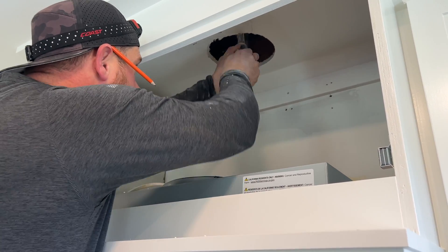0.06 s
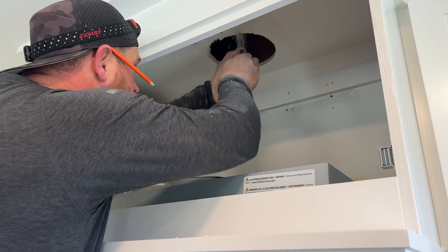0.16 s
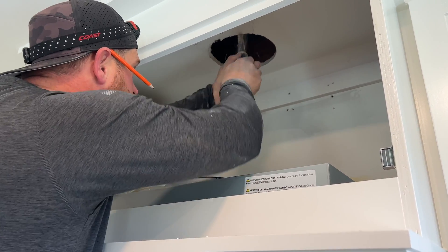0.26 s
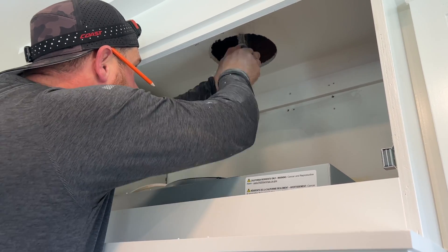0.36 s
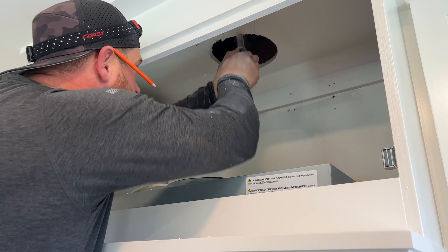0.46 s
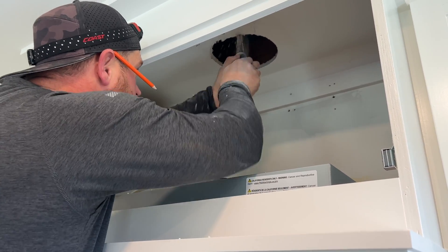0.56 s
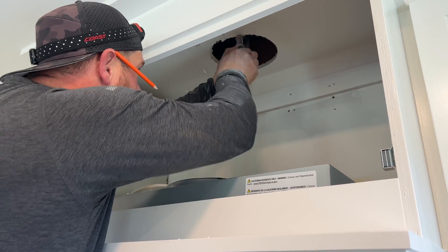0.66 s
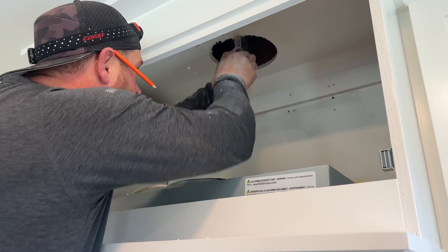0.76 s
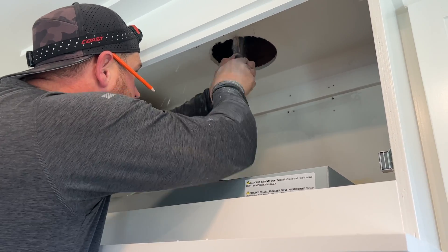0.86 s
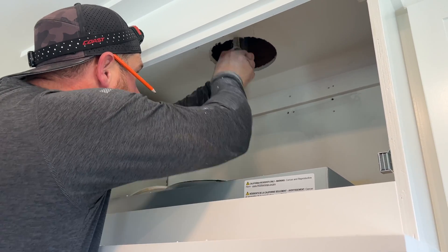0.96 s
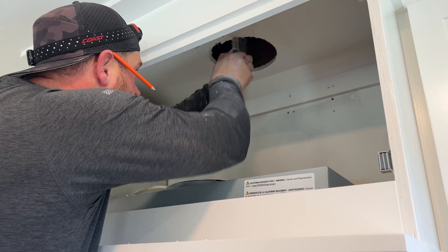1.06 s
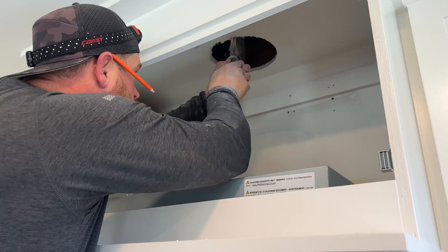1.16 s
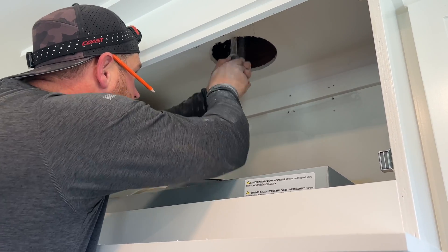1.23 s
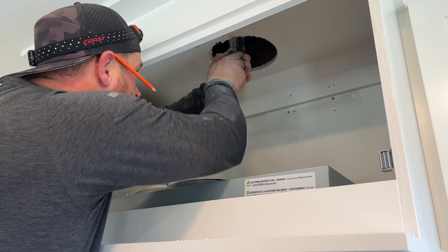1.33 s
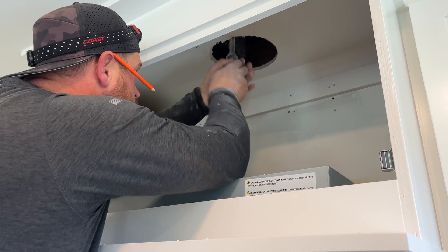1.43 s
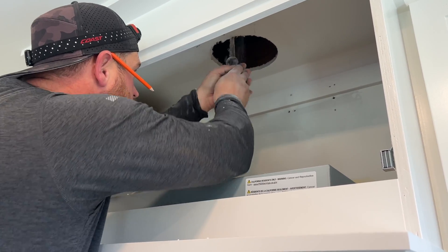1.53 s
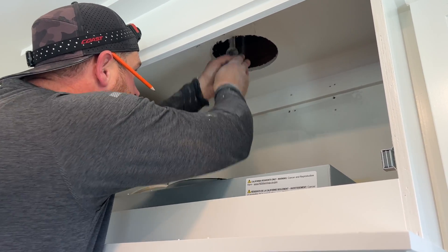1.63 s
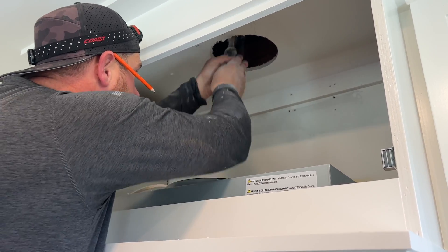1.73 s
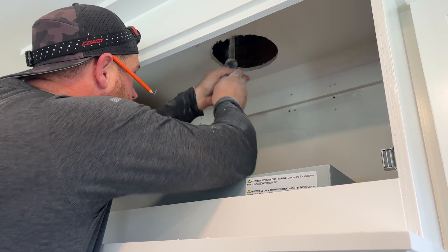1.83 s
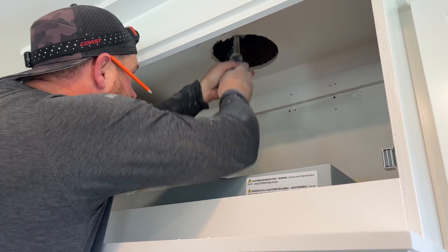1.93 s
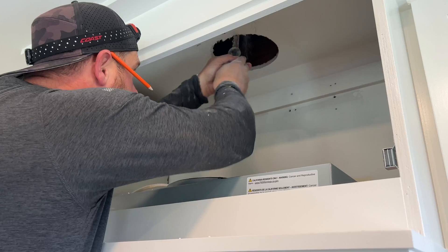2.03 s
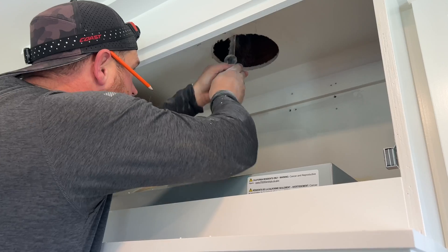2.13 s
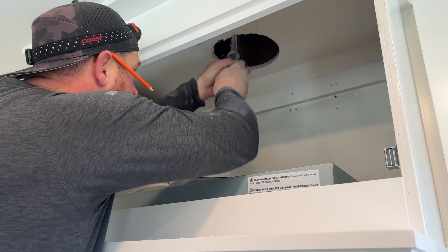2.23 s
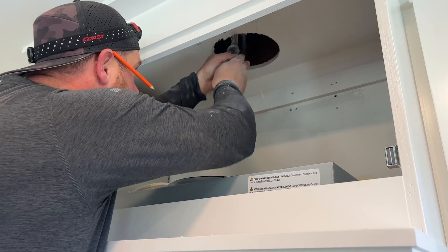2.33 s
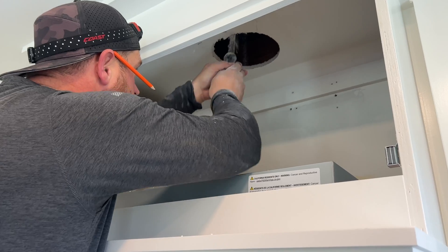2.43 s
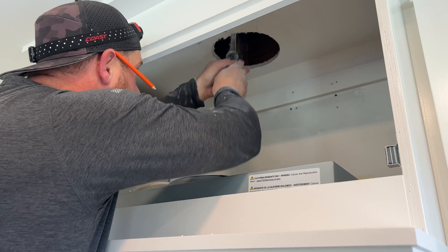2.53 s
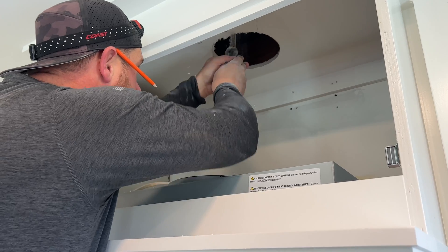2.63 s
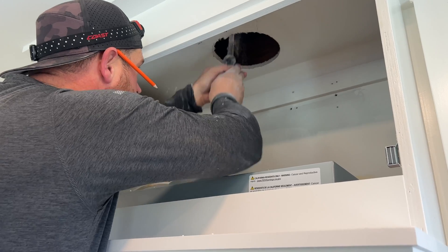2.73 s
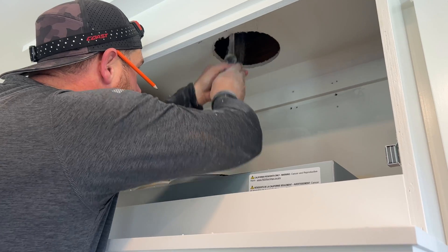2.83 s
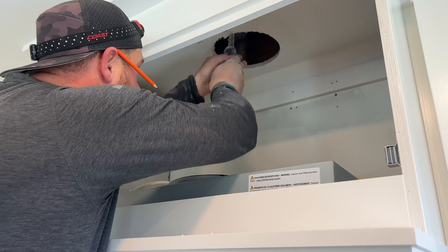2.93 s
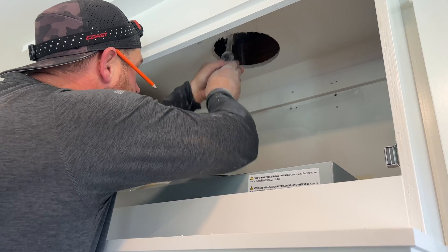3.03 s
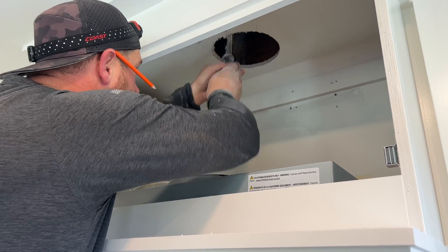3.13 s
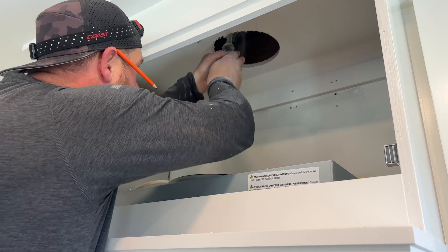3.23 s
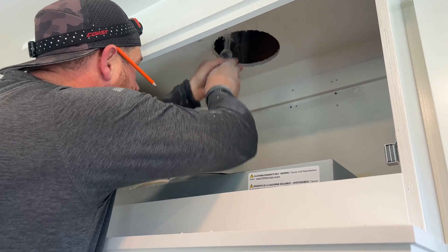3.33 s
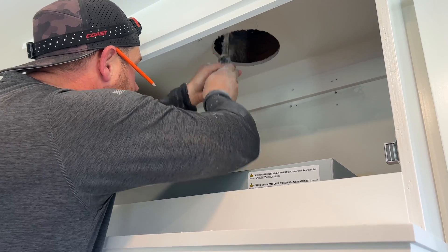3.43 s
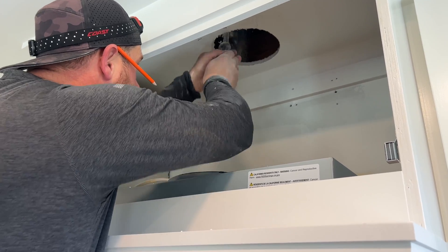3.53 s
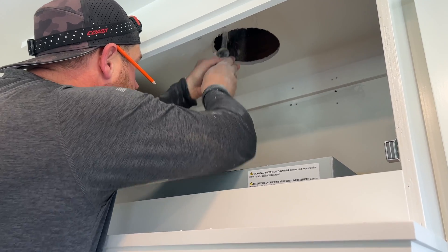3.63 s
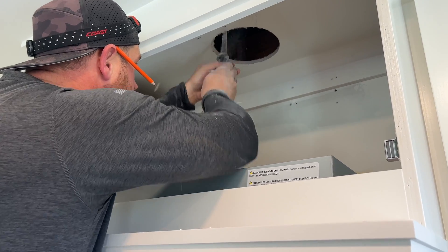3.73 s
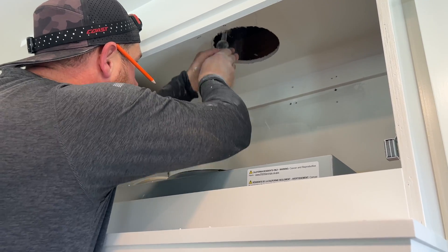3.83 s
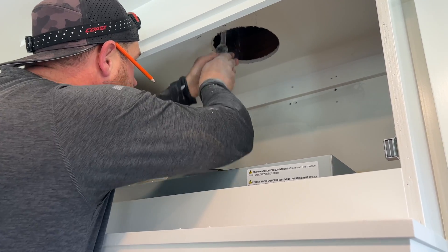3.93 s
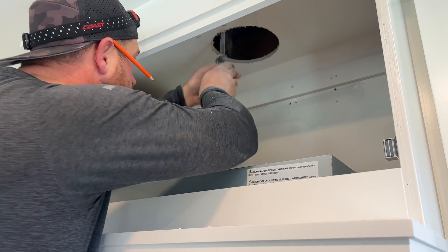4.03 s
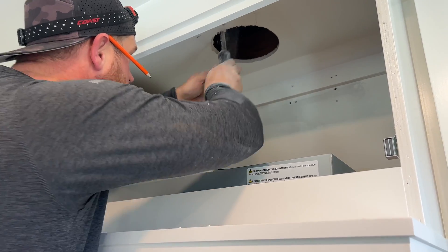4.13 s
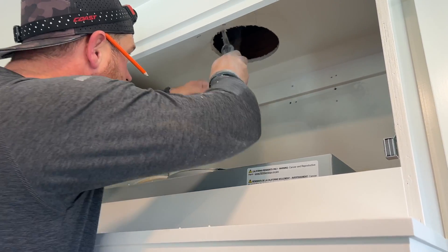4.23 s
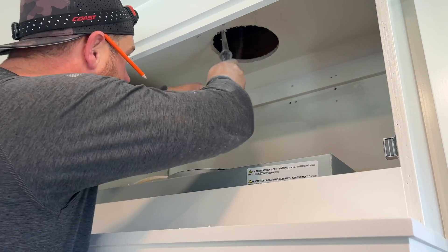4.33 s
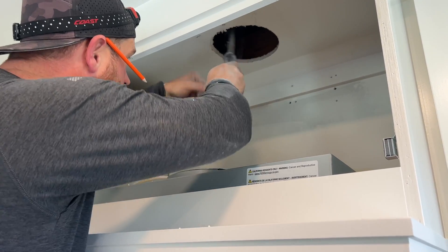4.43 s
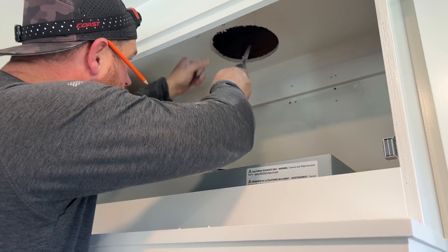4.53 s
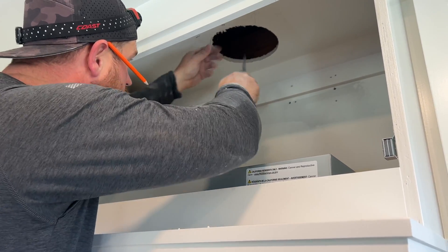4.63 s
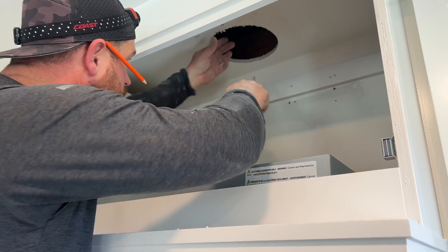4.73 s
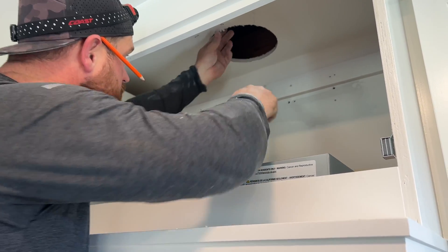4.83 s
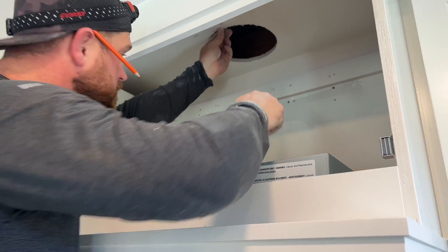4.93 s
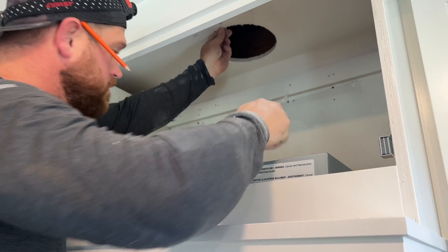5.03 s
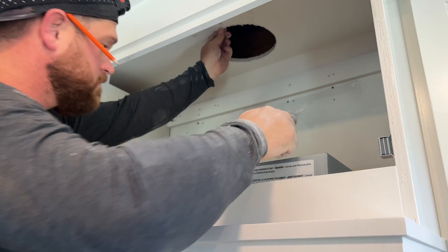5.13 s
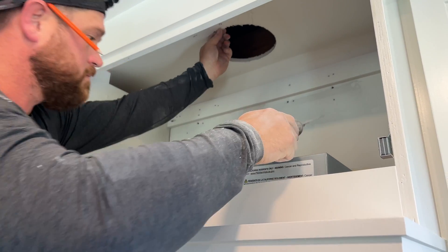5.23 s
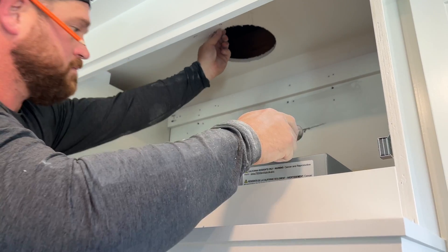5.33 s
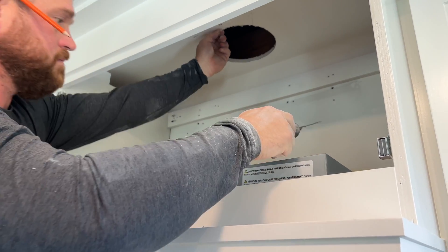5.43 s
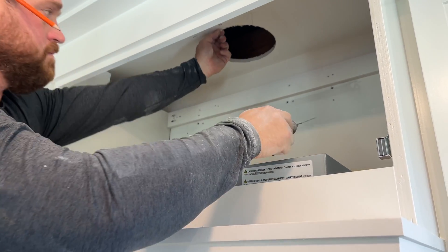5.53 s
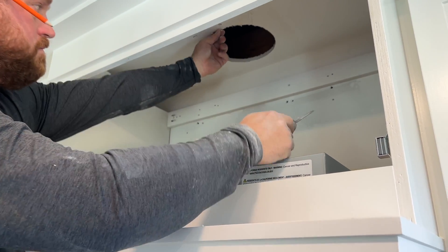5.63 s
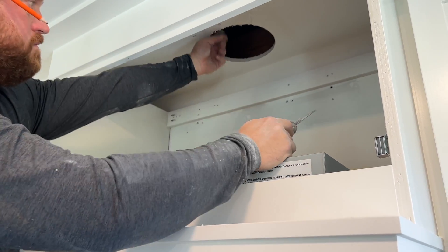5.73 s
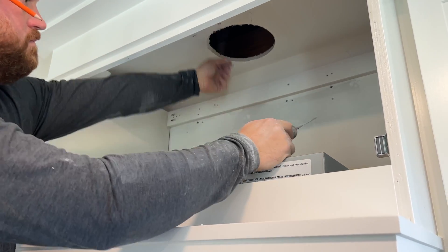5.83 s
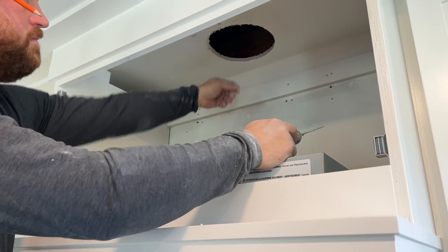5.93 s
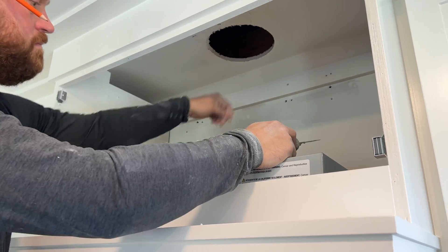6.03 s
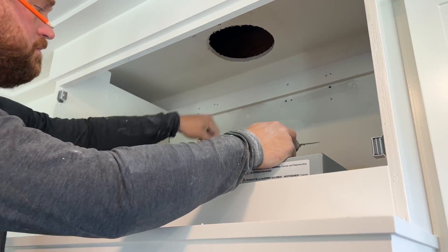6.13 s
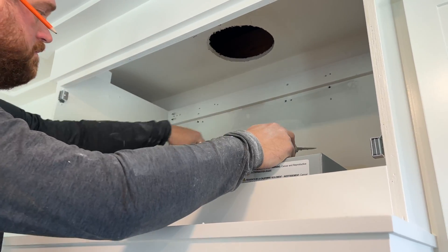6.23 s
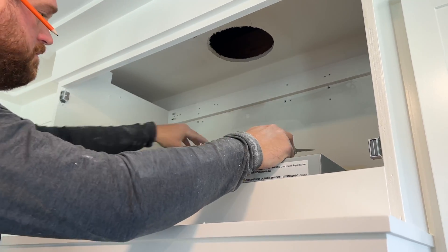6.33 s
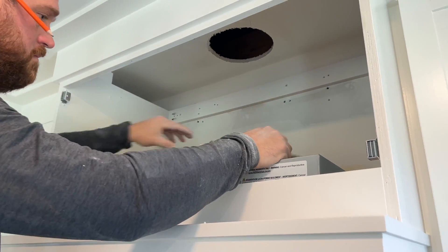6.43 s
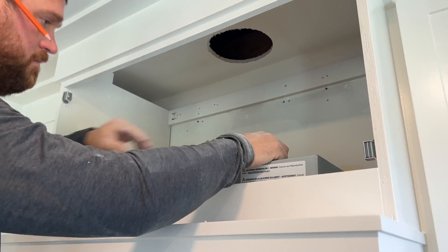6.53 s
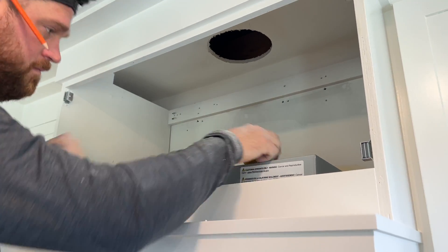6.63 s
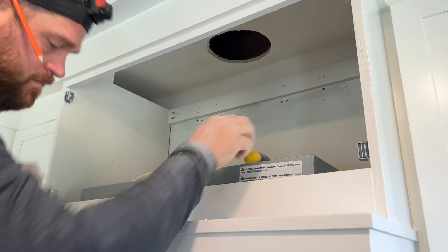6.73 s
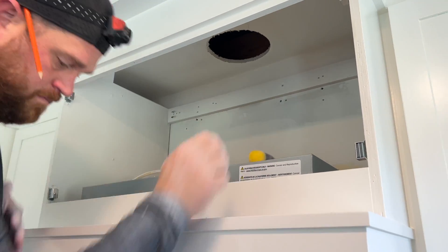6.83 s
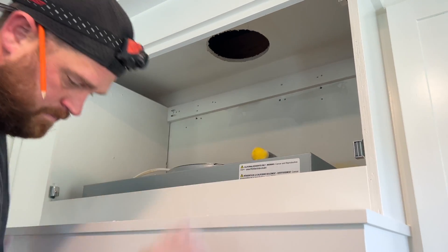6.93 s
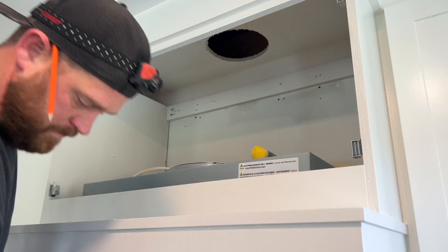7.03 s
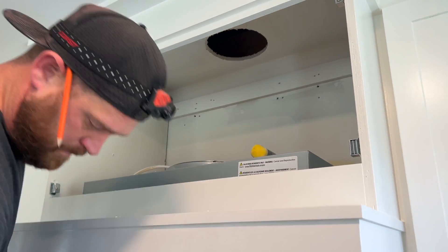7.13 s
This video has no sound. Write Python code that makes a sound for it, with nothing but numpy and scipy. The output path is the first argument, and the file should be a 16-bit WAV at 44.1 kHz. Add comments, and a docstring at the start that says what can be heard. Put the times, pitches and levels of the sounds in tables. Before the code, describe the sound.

Fast back-and-forth sawing of drywall with crunch and low judder in a hard kitchen, then quiet brushing and a sudden resonant knock of the tool landing.

```python
"""Sawing a hole in a kitchen ceiling

A jab saw cuts a round hole in plasterboard, about six strokes a second: shaped grains make its hiss,
crunch and growl, and teeth that catch ring the low tones of the sheet. Crumbs snap off, fingers brush
the rim, and the saw drops in a cupboard, where its blows ring the shelf. Noise echoes add a hard
kitchen, soft noise its air, and a phone hears it all through two ports."""
import sys
import numpy as np
from scipy import signal
from scipy.fft import rfft, irfft
from scipy.io import wavfile
from scipy.ndimage import uniform_filter1d

SR = 44100
rng = np.random.default_rng(int(sys.argv[2]) if len(sys.argv) > 2 else 0)


def wav_record(signal):
    """Record a signal, one row per channel, as 16-bit PCM in the file named by sys.argv[1]."""
    frames = np.transpose(np.atleast_2d(signal))
    bounded = np.clip(frames, -1, 1)
    # unit amplitude maps onto the largest positive 16-bit level
    quanta = np.round(bounded * 32767).astype(np.int16)
    wavfile.write(sys.argv[1], SR, quanta)


N = 315756  # length in samples
T = np.arange(N) / SR  # time in seconds
# All levels in the tables are relative: the functions that play them may add an overall level.


def gain(db):
    """Turn decibels into a plain multiplier."""
    return 10 ** (np.asarray(db) / 20)


def unit(x):
    """Scale to an rms of 1."""
    return x / np.sqrt(np.mean(x ** 2) + 1e-20)


def along(points, hz):
    """Read a curve of (f/Hz, value) points, with pitch on a log scale."""
    f, value = np.transpose(points)
    return np.interp(np.log(np.maximum(hz, 1)), np.log(f), value)


def convolve(x, response):
    """Let every sample of x set off the response; keep the length of x."""
    return signal.fftconvolve(x, response)[:len(x)]


def colour(points, rings=(), size=8192):
    """Make a unit-energy filter that only looks back: a smooth spectrum plus narrow peaks or dips."""
    hz = np.fft.rfftfreq(size, 1 / SR)
    db = along(points, hz)
    for f, width, lift in rings:
        db = db + lift / (1 + ((hz - f) / (width / 2)) ** 2)
    # folding the cepstrum forward in time gives the minimum-phase response
    cepstrum = irfft(np.log(gain(db)))
    cepstrum[1:size // 2] *= 2
    cepstrum[size // 2 + 1:] = 0
    return unit(irfft(np.exp(rfft(cepstrum)))) / np.sqrt(size)


def fade(t60):
    """Die away for one second, falling 60 dB in every t60 seconds."""
    return np.exp(-np.log(1000) * T[:SR] / t60)


def mode(hz, t60):
    """Ring one struck tone as a dying sine."""
    return np.sin(2 * np.pi * hz * T[:SR]) * fade(t60)


def burst(t60):
    """Make dying noise of unit energy, with its spectrum evened out."""
    spectrum = rfft(rng.standard_normal(SR) * fade(t60))
    ripple = np.sqrt(uniform_filter1d(np.abs(spectrum) ** 2, int(2 / t60) + 1))
    even = irfft(spectrum / ripple)
    return unit(even * fade(10 * t60)) / np.sqrt(SR)


def add(track, start, sound):
    """Mix a sound in at a time in seconds."""
    i = int(start * SR)
    track[i:i + len(sound)] += sound[:max(N - i, 0)]


def grains(rate, spread_db):
    """Scatter tiny cracks at random, about `rate` a second, in random sizes and signs."""
    size = gain(spread_db * np.minimum(rng.exponential(size=N), 4))
    return unit((rng.random(N) < rate / SR) * size * rng.choice([-1, 1], N))


def swell(start, length, peak, power):
    """Rise to a peak (a share of the length) and fall to nothing; cut off what lies before time 0."""
    shape = np.interp(T[:int(length * SR)] / length, [0, np.clip(peak, .1, .9), 1], [0, 1, 0])
    return unit(np.sin(np.pi / 2 * shape) ** power)[max(0, int(-start * SR)):]


def slides(rows, grit, peak, power):
    """Rub grainily: pressure swells and fades with each pass and sets how loud the grains are."""
    pressure = np.zeros(N)
    for start, length, db in rows:
        add(pressure, start, gain(db) * swell(start, length, peak, power))
    return pressure * grit


def squeals(rows, hz, t60):
    """Squeal: friction noise feeds one narrow tone for the length of each slip."""
    track = np.zeros(N)
    for start, length, db in rows:
        slip = swell(start, length, 0.39, power=0.81)
        tone = convolve(rng.standard_normal(SR), mode(hz, t60))[:len(slip)]
        add(track, start, gain(db) * slip * unit(tone))
    return track


# how long the kitchen rings at each pitch: (f/Hz, t60/s)
KITCHEN_DECAY = [(100, 0.61), (250, 0.88), (700, 0.72), (1500, 0.62), (4000, 0.61), (8000, 0.4),
                 (14000, 0.22)]


def room(x, cupboard_db, kitchen_db, cupboard_t60=0.073):
    """Add quick cupboard echoes and a slower kitchen tail; direct sound goes mostly to mid, little to side."""
    hz = np.fft.rfftfreq(SR, 1 / SR)
    out = []
    for direct in (1, 0.044):  # mid, then side
        noise = rfft(rng.standard_normal(SR))
        tail = 0
        for k, (_, t60) in enumerate(KITCHEN_DECAY):
            # this band is full at its own pitch and blends into its neighbours
            band = along([(f, j == k) for j, (f, _) in enumerate(KITCHEN_DECAY)], hz)
            tail = tail + irfft(noise * band) * fade(t60)
        tail = tail * np.minimum(T[:SR] / 0.015, 1) * np.sqrt(20 / SR)  # builds up over 15 ms
        echoes = gain(cupboard_db) * burst(cupboard_t60) + gain(kitchen_db) * tail
        out.append(direct * x + convolve(x, echoes))
    return np.array(out) / np.sqrt(1 + gain(cupboard_db) ** 2 + gain(kitchen_db) ** 2)


# spectrum of the still air in the kitchen: (f/Hz, level/dB)
AIR_COLOUR = [(18, -46.5), (30, -5.5), (284, -9.5), (324, -12), (410, -10), (455, -18.5), (970, -24.5),
              (1140, -25), (4000, -37.5), (10200, -37.5), (15500, -30.5)]


def kitchen_air(level_db=-61):
    """Fill mid and side with steady, separate noises in the colour of still air."""
    return gain(level_db) * np.array([convolve(rng.standard_normal(N), colour(AIR_COLOUR)) for _ in range(2)])


# saw strokes, in and out by turns, each lasting until the next:
# (t/s, blade hiss level/dB, force level/dB, judder level/dB, deepest bite [share of the stroke])
STROKE_ROWS = [(-0.075, -44.5, -34.5, -17.5, 0.86), (0.059, -47.5, -35, -13, .58),
               (0.246, -48.5, -39, -14.5, .66), (0.393, -46, -33, -12, 0.7),
               (0.553, -47.5, -37.5, -18, .66), (0.706, -48, -34, -13.5, 0.53),
               (0.871, -47.5, -37, -11.5, 0.62), (1.02, -47.5, -33, -12.5, 0.67),
               (1.176, -50, -37.5, -12.5, .6), (1.344, -60, -46.5, -27.5, 0.74),
               (1.538, -47, -36, -15.5, 0.73), (1.697, -45, -39, -23.5, .36), (1.867, -52.5, -45, -31, 0.2),
               (2.049, -47.5, -36.5, -17, .7), (2.171, -48.5, -44.5, -20.5, .44),
               (2.342, -46, -34, -12, 0.62), (2.482, -50, -37.5, -15.5, .68),
               (2.624, -46.5, -35, -18.5, 0.7), (2.779, -45, -35.5, -11.5, .8),
               (2.927, -47.5, -36, -15, 0.91), (3.099, -44, -35, -12, 0.72), (3.251, -43.5, -34, -16, 0.67),
               (3.416, -45, -34.5, -11.5, 0.69), (3.544, -49, -40, -16, 0.62),
               (3.717, -44.5, -34, -18, 0.6), (3.838, -49, -37, -15, .55)]
SAW_STOPS_S = 4.113
ENGAGE_S = .034  # from the start of a stroke to its first snapping tooth


def strokes():
    """Give each stroke its length, up to the next turn: (start, length, hiss, force, judder, deepest)."""
    ends = [row[0] for row in STROKE_ROWS[1:]] + [SAW_STOPS_S]
    return [(start, end - start, *rest) for (start, *rest), end in zip(STROKE_ROWS, ends)]


# the two low tones of the ceiling sheet: (f/Hz, t60/s)
DRUM, SAG = (125.8, 0.056), (77.8, 0.29)


def judder(length, hz, drum, sag, jitter=.11, scatter_db=6.5, limp=0.43, arch=0.21):
    """Teeth catch and let go unevenly, kicking the sheet; return its boom and the jerks."""
    count = max(2, int(round(length * hz)))
    # the more the drum tone outweighs the sag tone, the more evenly the teeth catch
    chance = rng.standard_normal((32, 2))[:count] * min(gain((sag - drum) / 2), 1)
    catches_s = (np.cumsum(1 + jitter * chance[:, 0]) - 1).clip(0) / hz
    at = (catches_s * SR).astype(int)
    grip = np.sin(np.pi * (np.arange(count) + .5) / count) ** arch
    size = gain(scatter_db * chance[:, 1])
    strong_weak = 1 + limp * (-1) ** np.arange(count)
    kicks, sway, boom = np.zeros((3, SR // 2))
    kicks[at] = grip * size
    sway[at] = grip * (size * strong_weak - size.mean())
    span = slice(SR // 200, int(length * SR) + SR // 100)  # where loudness is set
    # every catch drives the drum tone; their unevenness rocks the lower sag tone
    for push, ring, db in ((kicks, DRUM, drum), (sway, SAG, sag)):
        radiation = signal.butter(1, [ring[0] / 2, ring[0] * 2], "bandpass", fs=SR, output="sos")
        motion = signal.sosfilt(radiation, convolve(push, mode(*ring)))
        boom += motion * gain(db) / np.std(motion[span])
    return boom, kicks * gain(drum / 2)


# on the last stroke the blade jams and locks on to the sheet:
# (t/s, length/s, catches f/Hz, drum level/dB, sag level/dB)
JAM_SPELL = (4, .116, 128, -8.5, -28.5)
CATCH_HZ, CATCH_SPREAD = 121.2, 0.065  # catches a second, near the drum tone, and their random share
JUDDER_S, JUDDER_LEAD = .1, .5  # length of a spell, and its share before the deepest bite
SAG_DB, SAG_DB_PER_DB = -6.5, 0.82  # the sag tone grows more slowly than the judder that drives it


def sheet(drum_db=-0.36):
    """Shake the ceiling sheet around the deepest bite of every stroke, and hardest in the jam."""
    boom, jerks = np.zeros((2, N))
    spells = []
    for start, length, _, _, db, deepest in strokes():
        onset = start + deepest * length - JUDDER_LEAD * JUDDER_S
        catch_hz = CATCH_HZ * (1 + CATCH_SPREAD * rng.standard_normal())
        spells.append((onset, JUDDER_S, catch_hz, db + drum_db, SAG_DB + SAG_DB_PER_DB * db))
    for onset, *spell in spells + [JAM_SPELL]:
        for track, sound in zip((boom, jerks), judder(*spell)):
            add(track, max(onset, 0), sound)
    return boom, jerks


# the blade binds in the cut and sings: (t/s, length/s, level/dB)
SINGING_SLIPS = [(.45, .129, -45), (1.06, 0.13, -40), (2.66, 0.066, -36.5), (3.13, 0.095, -41),
                 (3.29, .145, -35.5), (3.615, .074, -39)]


def singing_blade(blade_hz=1123):
    """Sing when the blade binds: friction feeds its one narrow tone."""
    return room(squeals(SINGING_SLIPS, blade_hz, t60=0.51), cupboard_db=-14, kitchen_db=-20.5)


# narrow resonances (and a dip) of board, cupboard and blade: (f/Hz, width f/Hz, lift level/dB)
BODY_RINGS = [(219.8, 11, 10.5), (242.5, 16, 6.5), (363, 13, 3.5), (464, 12, 1.5), (529, 81, 8),
              (594, 43, 5), (749, 39.2, 12.5), (870, 23, 5.5), (1121, 58, 9), (1205, 22, 0.5),
              (1613, 96, 8), (1900, 38, -16), (2574, 69, 7), (2860, 34, 4), (3094, 130, 8.5)]
# spectrum of the growling board: (f/Hz, level/dB)
BOARD_COLOUR = [(50, -22), (100, -12.5), (150, 5.5), (210, -1.5), (300, 2), (450, -5), (600, -6),
                (800, -12.5), (1200, -14), (2500, -43)]
# spectrum of crunching gypsum: (f/Hz, level/dB)
CRUNCH_COLOUR = [(400, -19.5), (900, -2.5), (1400, -1.5), (1900, -3.5), (3100, -8.5), (3700, -13),
                 (5500, -17), (9000, -32)]
# spectrum of the blade's hiss: (f/Hz, level/dB)
HISS_COLOUR = [(1500, -23.5), (3500, 2), (5500, -4.5), (7000, -3), (8500, -0.5), (10500, 2), (12000, 1.5),
               (14000, -4.5), (15700, -2)]
FASTEST = 0.48  # share of a stroke at which the blade moves fastest
SLACK_DB = -1  # the blade slides lightly after each turn, for ENGAGE_S
# the board beside the cut loosens as the saw advances, so its resonance sinks
RIM_HZ, RIM_FALL_HZ_PER_S, RIM_WIDTH_HZ, RIM_DB = 459, 30.4, 160, 7.5


def saw(hiss_db=3.0, crunch_db=1, board_db=6.0, knock_db=-7.0, chatter=0.13, tooth_t60=0.034, crumble_db=1.5):
    """Turn blade speed into hiss, and force and depth of bite into crunch and the growl of the board."""
    boom, jerks = sheet()
    # gypsum breaks in a spray after each jerk, and gives way in uneven lumps
    spray = convolve(jerks, fade(tooth_t60)).clip(0)
    lumps = unit(uniform_filter1d(rng.standard_normal(N), size=400))
    teeth = (1 + chatter * unit(spray)) * gain(crumble_db * lumps)
    teeth = teeth / np.sqrt(uniform_filter1d(teeth ** 2, SR // 20))  # even out slow changes
    fine = teeth * grains(rate=12000, spread_db=1.0)
    coarse = teeth * grains(rate=2400, spread_db=0.5)
    heavy = teeth * grains(rate=2000, spread_db=0.7)
    rasp = gain(knock_db) * convolve(jerks, colour(BOARD_COLOUR, BODY_RINGS))
    for s, length, hiss, db, _, deepest in strokes():
        # each stroke bears on a new spot of the rim and wakes the resonances differently
        rings = [(hz, width, lift * rng.uniform(.5, 1.4)) for hz, width, lift in BODY_RINGS]
        rings.append((RIM_HZ - RIM_FALL_HZ_PER_S * s, RIM_WIDTH_HZ, RIM_DB))
        speed = gain(hiss + hiss_db) * swell(s, length, FASTEST, power=0.8)
        bite = gain(db + crunch_db) * swell(s, length, (FASTEST + deepest) / 2, power=.9)
        load = gain(db + board_db) * swell(s, length, deepest, power=1.1)
        start = max(s, 0)
        contact = gain(SLACK_DB * (start + T[:len(speed)] < s + ENGAGE_S))
        layers = ((speed, fine, colour(HISS_COLOUR)),
                  (bite, coarse, colour(CRUNCH_COLOUR, rings)),
                  (load, heavy, colour(BOARD_COLOUR, rings)))
        for force, grit, body in layers:
            rubbing = contact * force * grit[int(start * SR):][:len(force)]
            add(rasp, start, signal.fftconvolve(rubbing, body))
    booming = room(boom, cupboard_db=-24, kitchen_db=-14.5)
    return booming + room(rasp, cupboard_db=-3.5, kitchen_db=-4.5) + singing_blade()


# the blade and loose crumbs scrape lightly along the rim: (t/s, length/s, level/dB)
SCRAPE_PASSES = [(1.375, 0.058, -45.5), (4.015, .06, -42), (4.156, .04, -45), (4.243, 0.031, -55.5),
                 (4.4, 0.038, -56.5), (4.668, 0.051, -62.5), (5.61, 0.18, -68.5), (6.18, .045, -69)]


def scrapes():
    """Scrape the rim lightly with swelling trains of small cracks."""
    return slides(SCRAPE_PASSES, grains(rate=3000, spread_db=2), peak=.25, power=1.2)


# crumbs of gypsum snap off and the blade ticks on the rim: (t/s, level/dB)
CRUMB_SNAPS = [(0.1153, -26), (0.279, -23.5), (0.4278, -31), (0.7837, -15.5), (1.0832, -19.5),
               (1.9206, -22.5), (2.698, -34), (3.452, -28.5), (4.1636, -32), (5.7219, -33.5)]
# spectrum of a snap or scrape: (f/Hz, level/dB)
SNAP_COLOUR = [(200, -18), (700, 6.5), (1500, 2.5), (3000, 2.5), (6000, -7), (9000, 1), (13000, -0.5),
               (16000, -5)]


def snaps(snap_db=13.0, t60=0.039, first_tooth_db=6, scatter_db=2):
    """Crack gypsum in short noise bursts, at first teeth and loose crumbs, along with the scrapes."""
    track = scrapes()
    first_teeth = [(start + ENGAGE_S, force + first_tooth_db + scatter_db * rng.standard_normal())
                   for start, _, force, _, _ in STROKE_ROWS if start > 0]
    for start, db in CRUMB_SNAPS + first_teeth:
        add(track, start, gain(db + snap_db) * burst(t60))
    return room(convolve(track, colour(SNAP_COLOUR, BODY_RINGS)), cupboard_db=-2, kitchen_db=-6.5)


# fingers brush the rim, sleeves the cupboard: (t/s, length/s, level/dB)
BRUSH_PASSES = [(4.05, 0.45, -53), (4.75, 0.38, -60), (5.02, 0.39, -53.5), (5.37, .14, -53.5),
                (5.72, 0.48, -56.5), (6.8, 0.16, -50), (6.96, .22, -51.5)]
# spectrum of rubbing skin and cloth: (f/Hz, level/dB)
RUB_COLOUR = [(60, 13.5), (130, 7), (400, -11.5), (700, -5), (1100, -11.5), (2000, -14.5), (5000, -22),
              (9000, -27), (13000, -22), (16000, -35.5)]
# hands bump the sheet: (t/s, level/dB)
HAND_BUMPS = [(4.985, -45), (5.306, -43.5), (5.431, -46), (5.728, -31), (5.754, -30.5), (5.918, -42),
              (5.975, -49)]
# spectrum of the soft pat in a bump: (f/Hz, level/dB)
PAT_COLOUR = [(80, -2.5), (200, 3.0), (450, 5.5), (1200, -29), (4000, -38), (12000, -37.5)]
# a fingertip squeaks off the rim: (t/s, length/s, level/dB)
SQUEAK_SLIPS = [(5.868, .08, -61)]


def hands(sag_db=-5, pat_db=6, thud_t60=0.152, squeak_hz=1010):
    """Bump two low tones softly with a pat, rub in coloured grains, and squeak once on a narrow tone."""
    thuds = np.zeros(N)
    brushing = slides(BRUSH_PASSES, grains(rate=750, spread_db=-0.5), peak=0.34, power=0.79)
    rub = convolve(brushing, colour(RUB_COLOUR))
    for start, db in HAND_BUMPS:
        thud = mode(125.7, thud_t60) + gain(sag_db) * mode(78, thud_t60)
        add(thuds, start, gain(db) * thud)
        pat = convolve(burst(0.043), colour(PAT_COLOUR))
        add(rub, start, gain(db + pat_db) * pat)
    rub += squeals(SQUEAK_SLIPS, squeak_hz, t60=0.066)
    return room(thuds, cupboard_db=-19, kitchen_db=-18.5) + room(rub, cupboard_db=1.5, kitchen_db=-5.5)


# the saw lands and rattles to rest: (t/s, level/dB, brightness level/dB)
LANDING_BLOWS = [(6.5096, -3.5, 1), (6.513, -6, -1), (6.5205, 4.5, -14), (6.530, 1, -24), (6.549, -2, -26),
                 (6.577, -7, -35), (6.640, -9, -34)]
# ringing tones of the cupboard shelf: (f/Hz, level/dB, t60/s)
SHELF_TONES = [(108.2, -1.5, 0.4), (153.4, -2.5, 1), (206, -22, 0.82), (250.4, 2.5, 0.28), (460, -20, 0.92),
               (730, -18, 1.0), (723, -15, 0.69), (844, -8, 0.43), (880, -19, 0.46), (968, -24, 0.73),
               (1050, -25, 0.58), (1440, -11, 0.088), (1620, -28, 0.81), (2760, -36, 0.41)]
# spectrum of the clack: (f/Hz, level/dB)
CLACK_COLOUR = [(70, -11.5), (110, 11), (300, 7), (520, -4.5), (850, 2), (1300, -5.5), (2200, -8.5),
                (3500, -15.5), (5200, -18), (8000, -18.5), (9500, -8), (12000, -12), (14000, -8),
                (16000, -19)]


def dropped_saw(clack_db=13.5, shelf_db=-27, dull_hz=1800, clack_t60=.062):
    """Strike the shelf: two bright first clicks, then the heaviest blow, then duller, weakening rattles."""
    blows, clack = np.zeros(N), np.zeros(N)
    lowpass = signal.butter(1, dull_hz, fs=SR, output="sos")
    for start, db, bright_db in LANDING_BLOWS:
        add(blows, start, gain([db]))
        crack = burst(clack_t60)
        dull = signal.sosfilt(lowpass, crack)
        add(clack, start, gain(db) * (dull + gain(bright_db) * (crack - dull)))
    ringing = sum(gain(db + shelf_db) * mode(hz, t60) for hz, db, t60 in SHELF_TONES)
    shelf = room(convolve(blows, ringing), cupboard_db=-20, kitchen_db=-14)
    clack = gain(clack_db) * convolve(clack, colour(CLACK_COLOUR))
    return shelf + room(clack, cupboard_db=-5, kitchen_db=-1.0)


# how strongly the side signal is let through: (f/Hz, level/dB)
SIDE_WIDTH = [(60, -4), (130, -14.5), (250, -9), (500, -6), (1000, -1), (2000, -0.5), (6000, 2.5),
              (8500, -3), (9500, -35.5), (11500, -14.5), (13500, -21), (15500, -1.5)]


def scene():
    """Sum all sources as mid and side, then open them out to left and right."""
    mid, side = saw() + snaps() + hands() + dropped_saw() + kitchen_air()
    hz = np.fft.rfftfreq(2 * N, 1 / SR)
    side = irfft(rfft(side, 2 * N) * gain(along(SIDE_WIDTH, hz)))[:N]
    return np.array([mid + side, mid - side])


# how much louder the left port is than the right: (f/Hz, level/dB)
PORT_BALANCE = [(100, 1.37), (1000, 1.3), (2200, -1), (4000, 2), (5500, 7), (7000, 1.5), (8300, 4),
                (9500, 0)]
# how far the right port is turned ahead in phase: (f/Hz, lead [turns])
PORT_LEAD = [(7200, 0), (8500, .2), (9200, .48), (10800, .53), (12400, 1), (14400, 1), (15700, 1.5)]


def record(dry):
    """Hear through a phone's two ports, unlike in level and treble phase; cut deep bass and extreme top."""
    hz = np.fft.rfftfreq(2 * N, 1 / SR)
    tilt = gain(along(PORT_BALANCE, hz) / 2)
    ports = np.array([tilt, np.exp(2j * np.pi * along(PORT_LEAD, hz)) / tilt])
    heard = irfft(rfft(dry, 2 * N) * ports)[:, :N]
    heard = signal.sosfilt(signal.butter(3, 38, "highpass", fs=SR, output="sos"), heard)
    return signal.sosfilt(signal.ellip(10, .2, 80, 15750, fs=SR, output="sos"), heard)  # top at 15750 Hz


dry = scene()
out = record(dry)
wav_record(out)
```